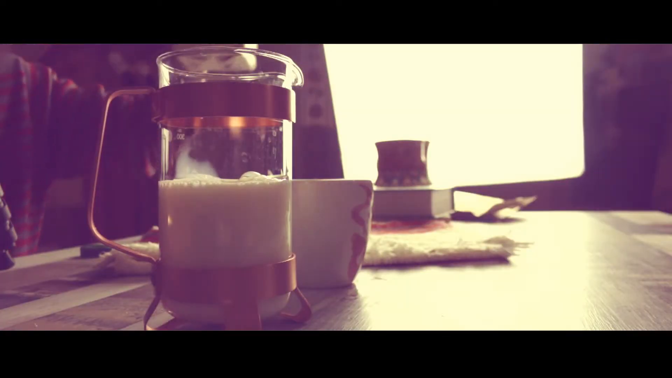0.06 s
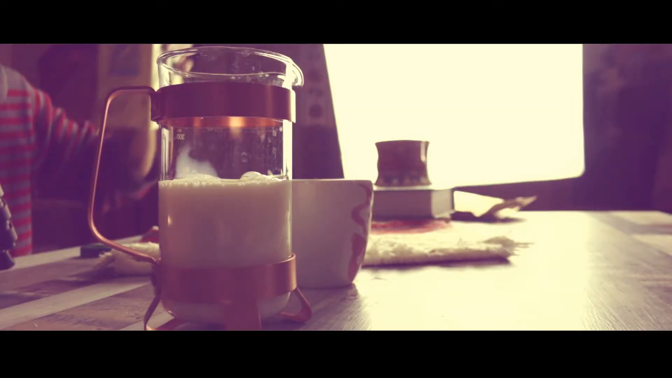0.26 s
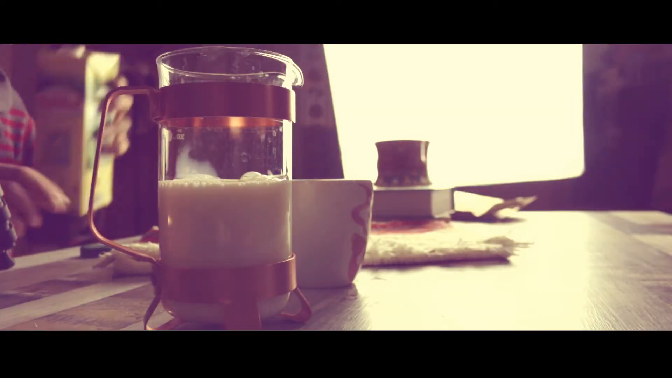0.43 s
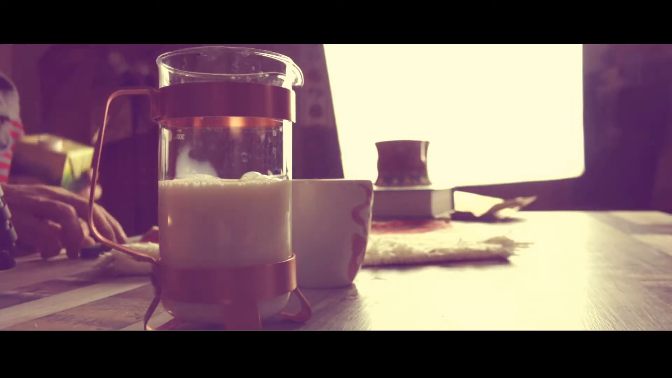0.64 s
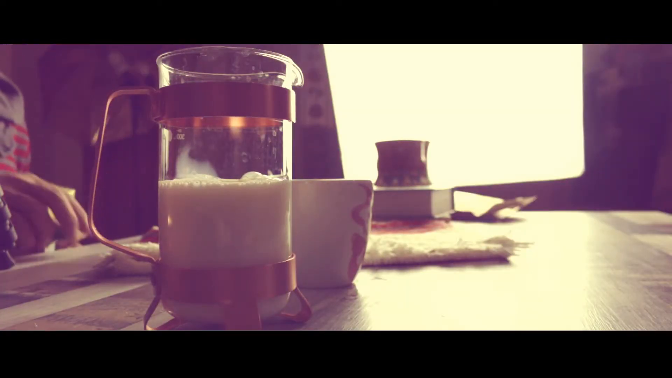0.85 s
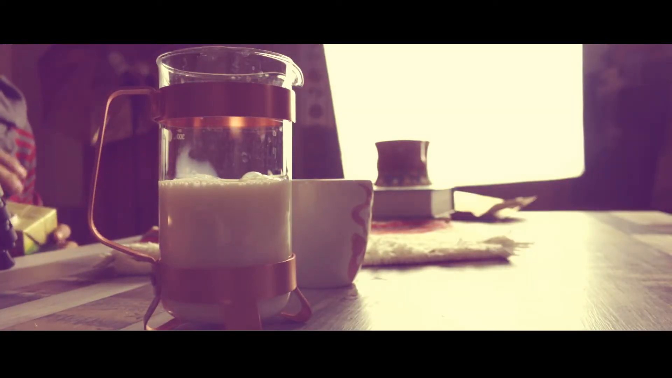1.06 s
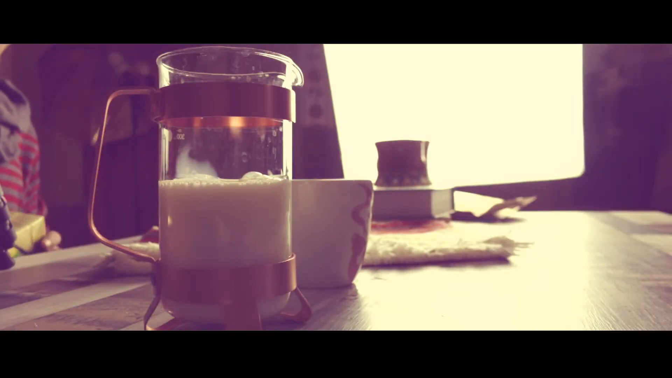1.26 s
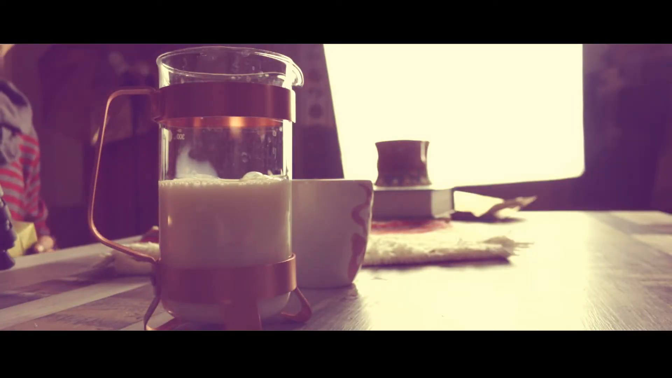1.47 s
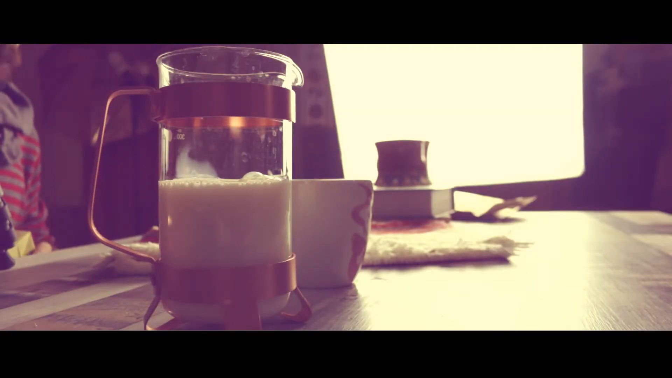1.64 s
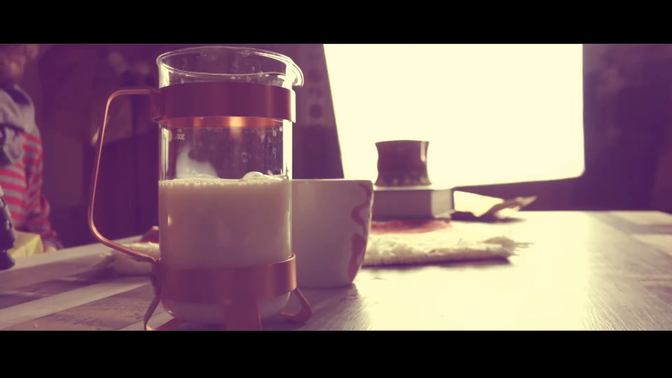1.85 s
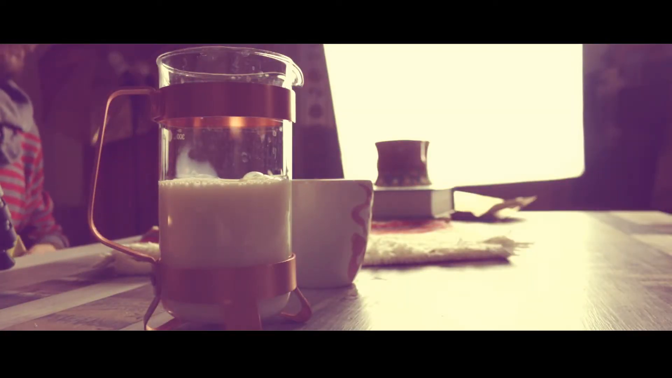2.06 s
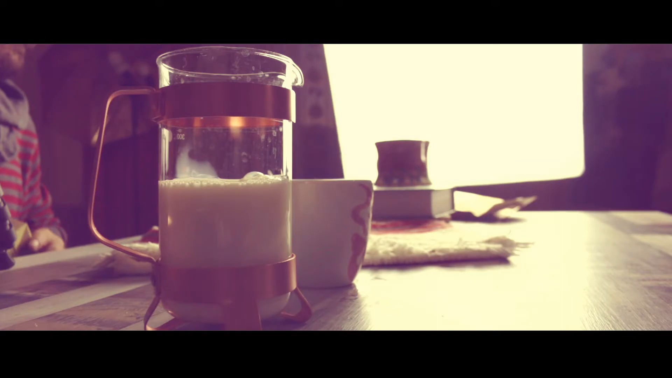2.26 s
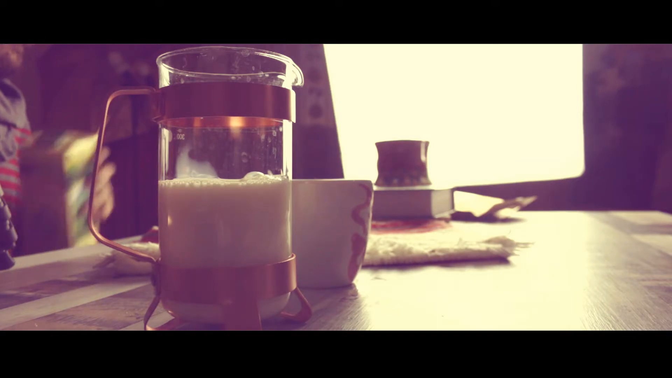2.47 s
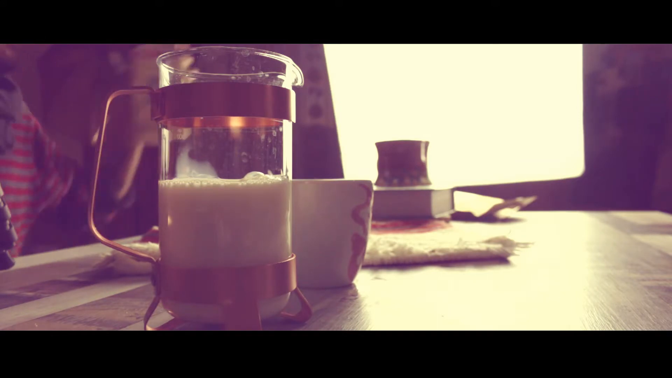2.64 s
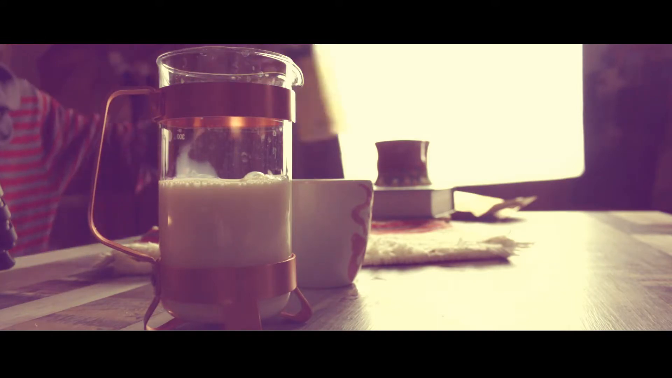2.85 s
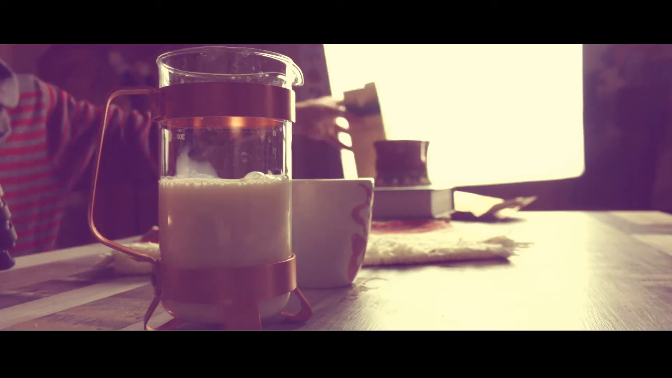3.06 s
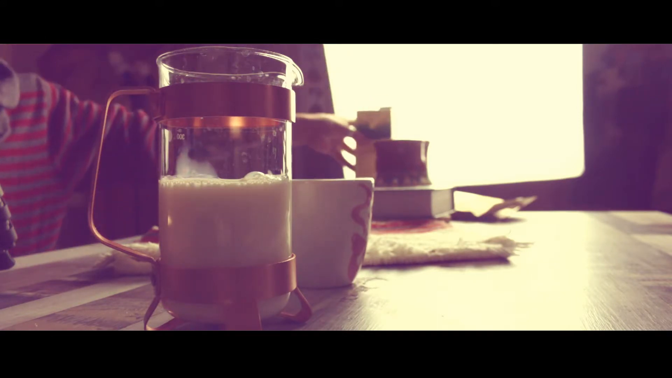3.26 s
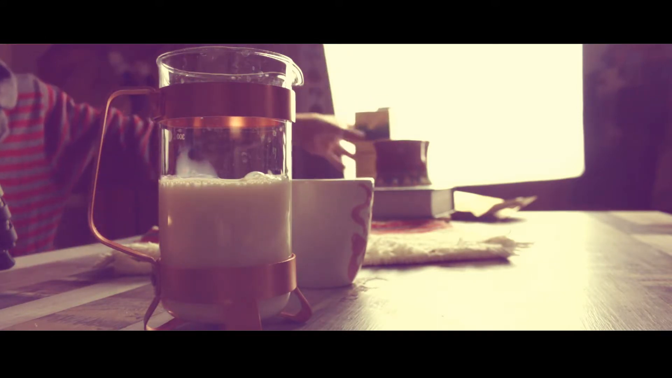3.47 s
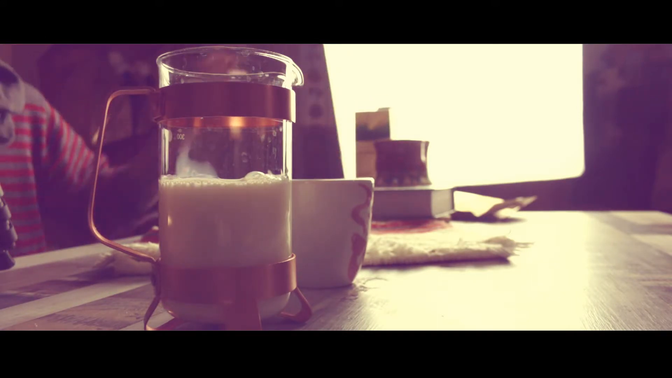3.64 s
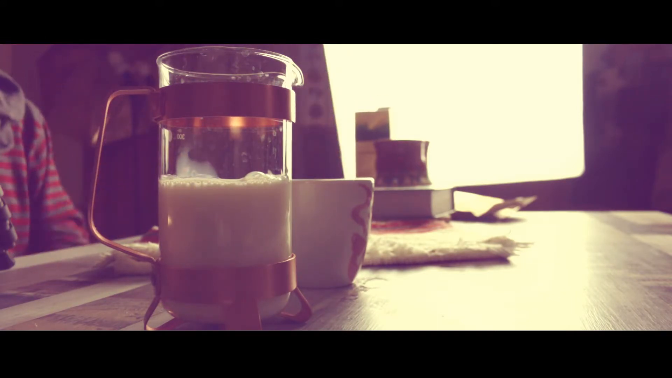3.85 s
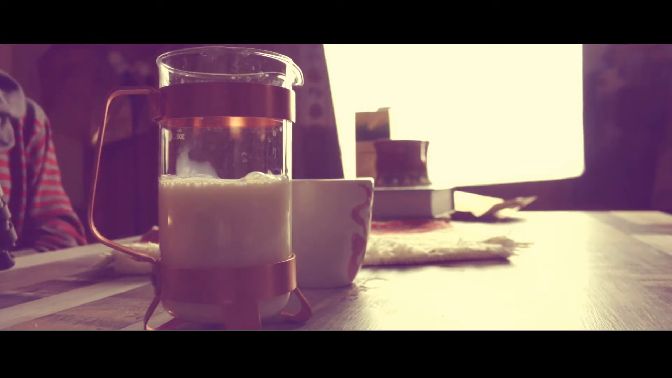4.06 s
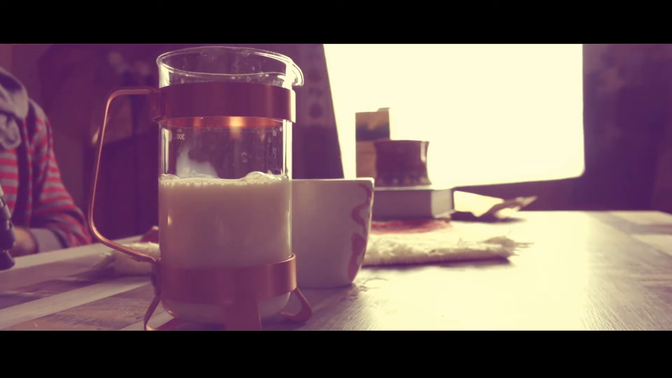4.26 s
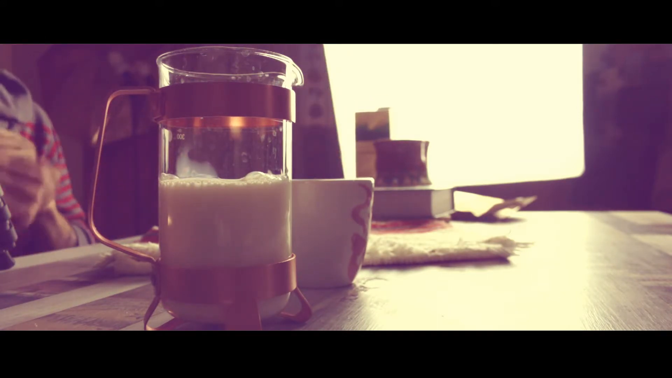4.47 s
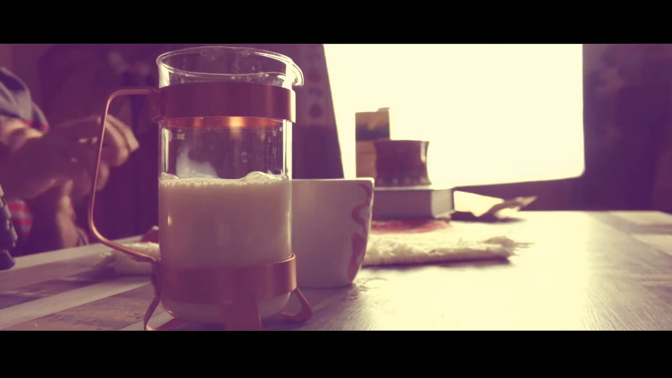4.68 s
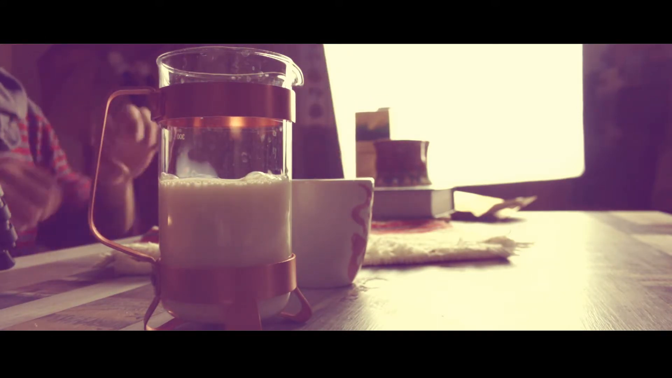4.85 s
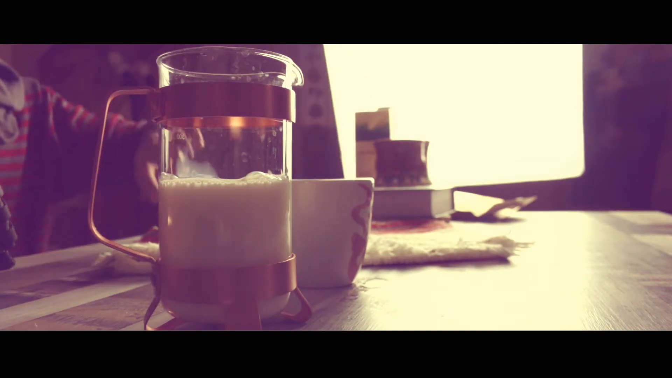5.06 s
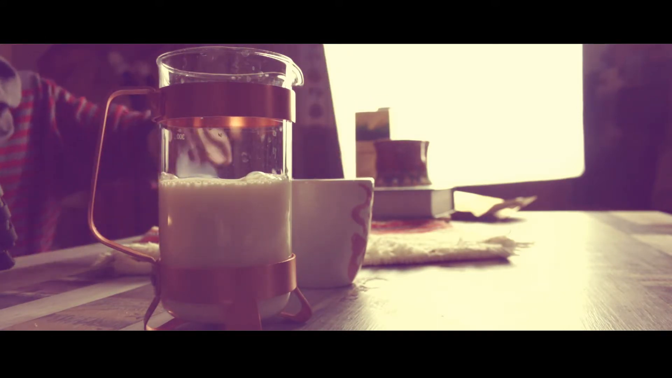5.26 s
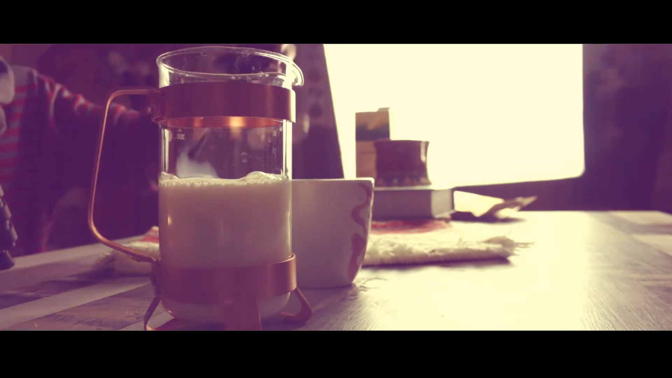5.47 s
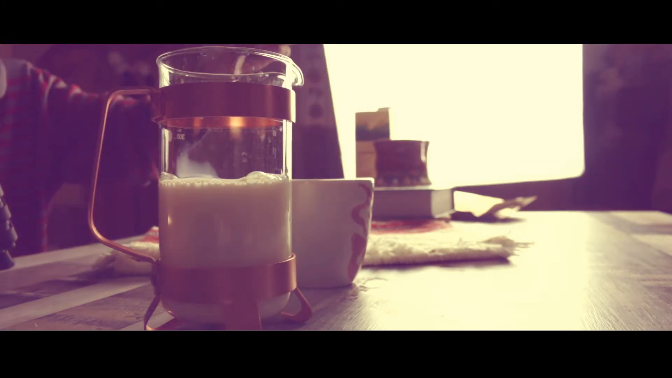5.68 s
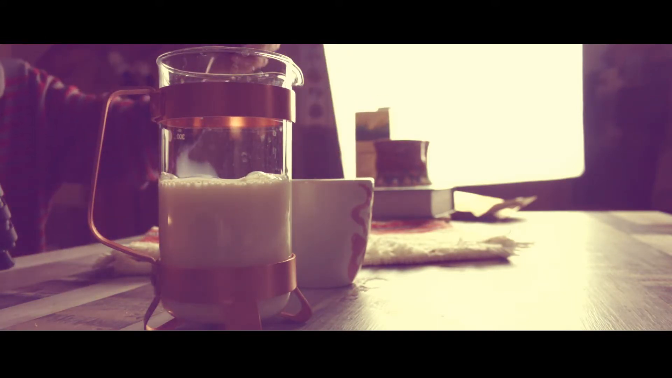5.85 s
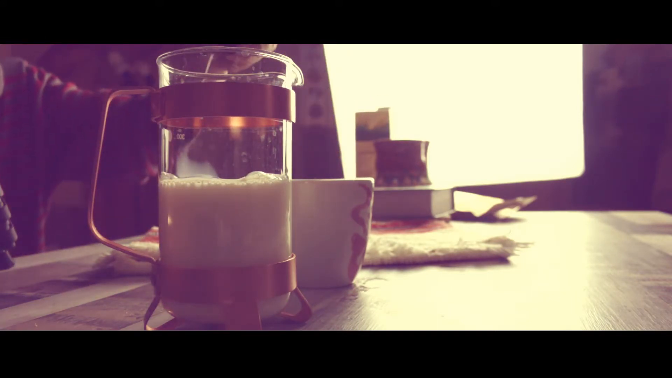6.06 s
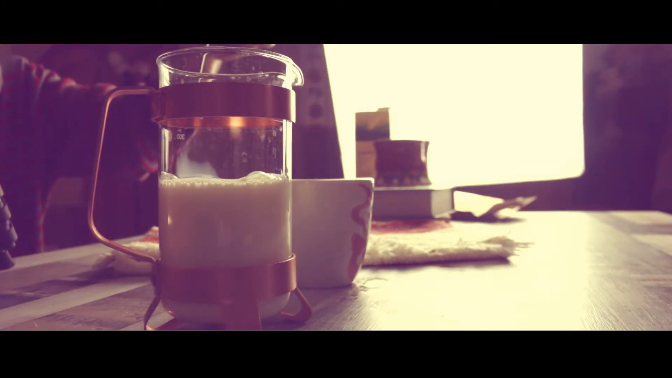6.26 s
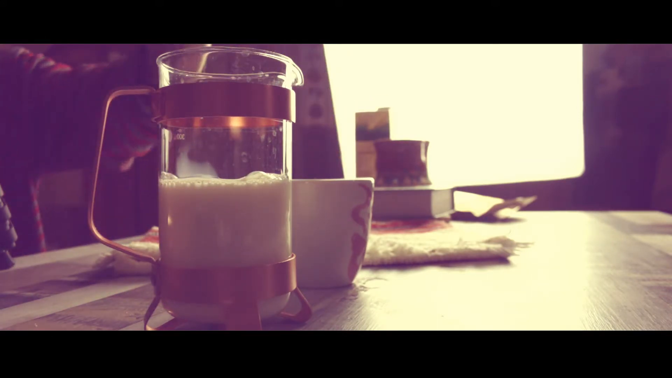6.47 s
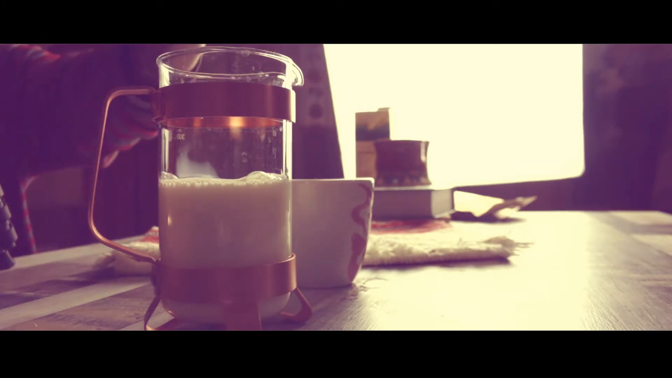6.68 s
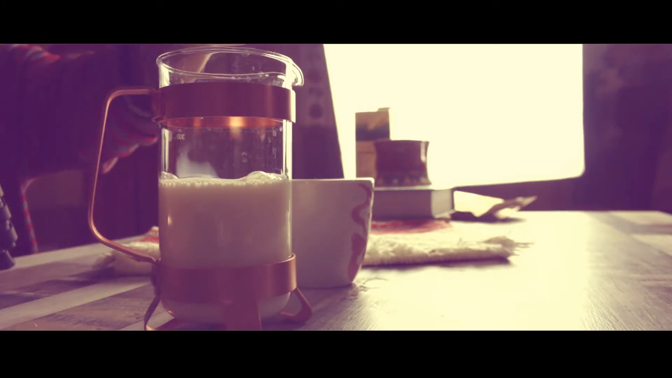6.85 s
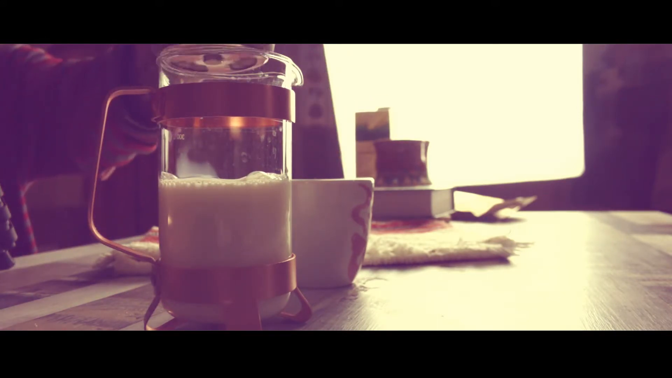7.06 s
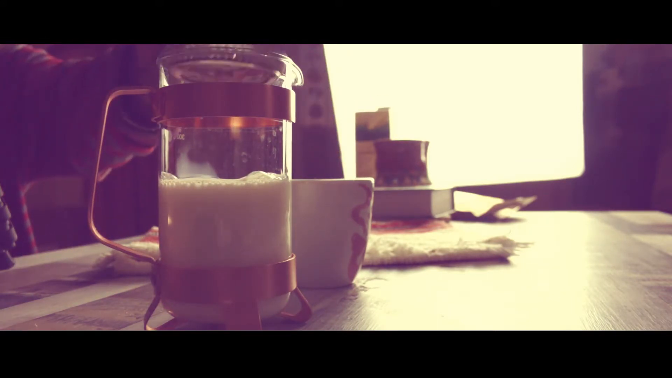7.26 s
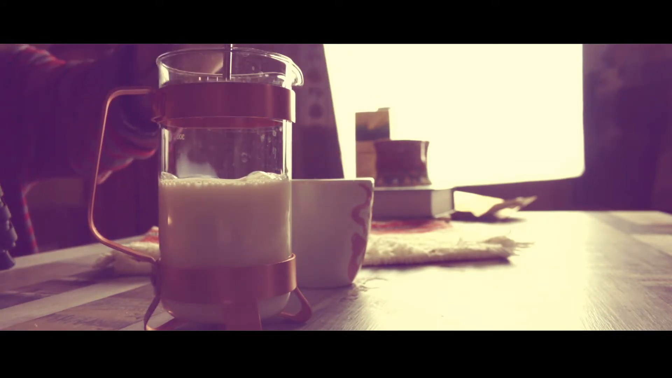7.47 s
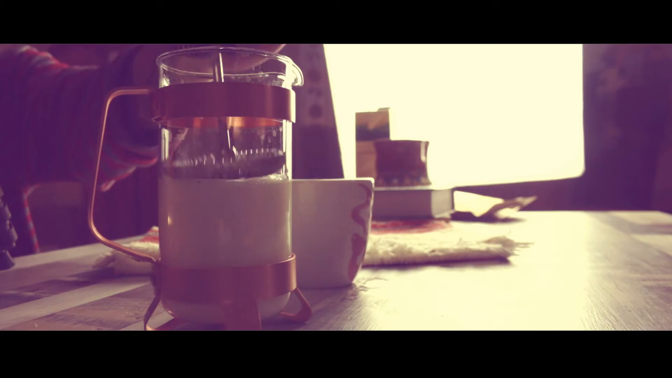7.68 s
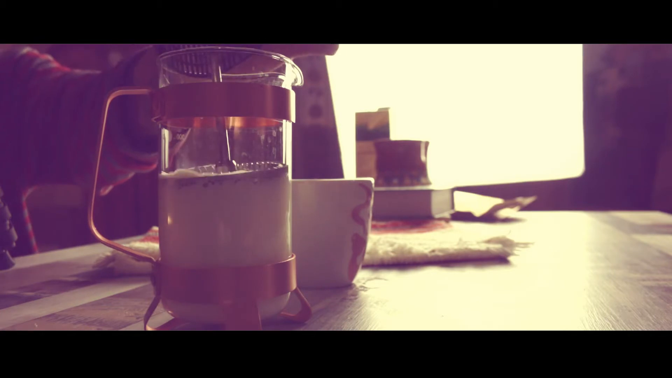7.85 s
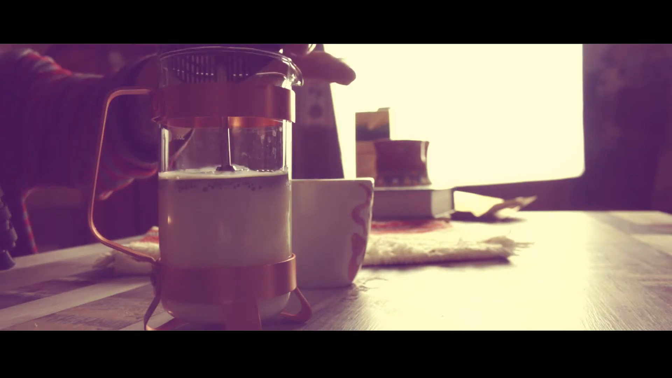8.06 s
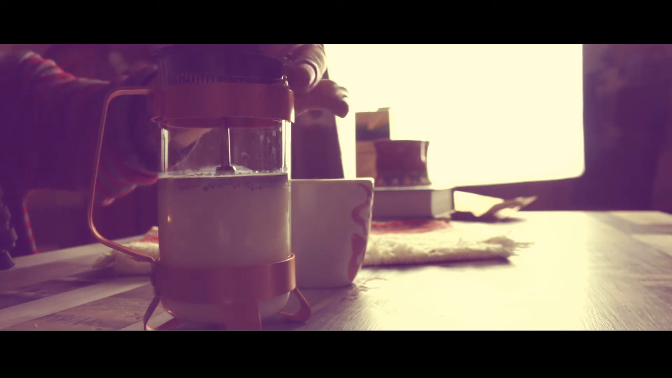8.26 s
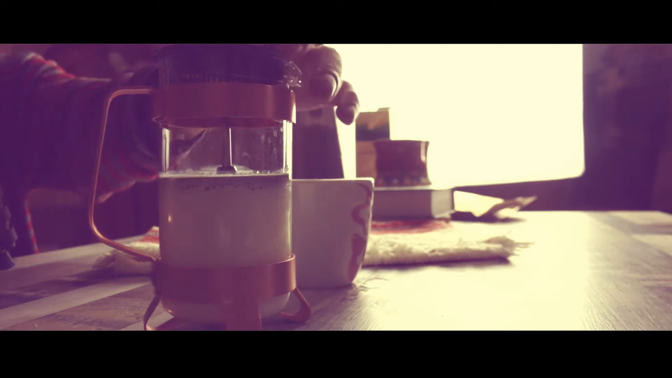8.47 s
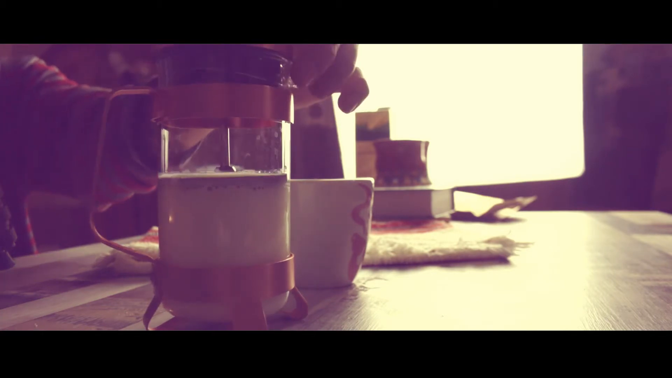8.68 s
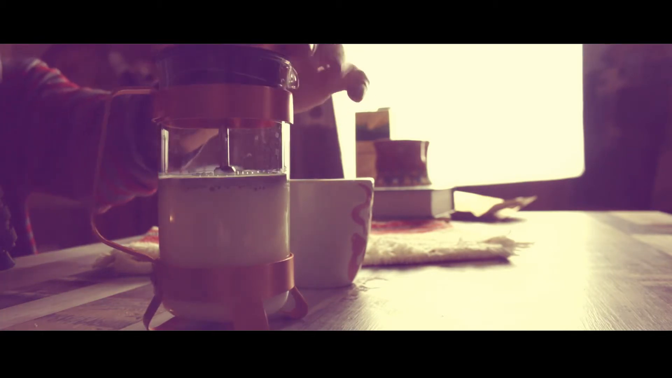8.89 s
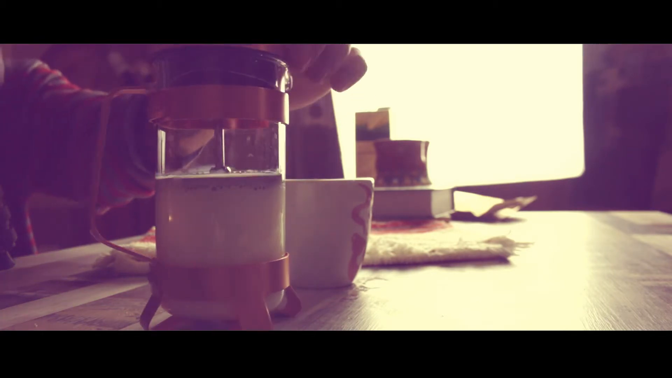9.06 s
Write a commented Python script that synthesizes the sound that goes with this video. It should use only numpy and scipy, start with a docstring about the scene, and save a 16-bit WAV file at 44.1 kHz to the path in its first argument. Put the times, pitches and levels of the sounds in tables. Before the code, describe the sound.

Sparse kitchen handling heard close, mostly left of centre, over quiet low hum and hiss. A carton is tapped, slid, capped with a sharp snap and put down with a thud. After a soft cloth rustle come bright irregular metal clicks, light ticks and scraping on glass, then a sudden loud metallic lid clack far above everything else. Faint rattles and a soft table thump end it in short room reverberation.

```python
"""Soft hollow taps on a milk carton come first, over a faint hum and hiss in a small, live room.
The carton is slid, capped and put aside; a metal plunger clicks in the hand, scrapes into a glass carafe,
and its lid lands with a loud clack. Heavier knocks thump through the wooden table.
Blows are short noise bursts plus dying sine tones, scrapes are swelling noise, and the room adds a noise tail."""
import sys
import numpy as np
from scipy import signal
from scipy.fft import rfft, irfft
from scipy.io import wavfile
from scipy.ndimage import uniform_filter1d

SR = 44100
rng = np.random.default_rng(int(sys.argv[2]) if len(sys.argv) > 2 else 0)


def dump(signal):
    """Clip the signal to [-1, 1] and save it as 16-bit WAV at the path in sys.argv[1]."""
    limited = np.clip(np.atleast_2d(signal).T, -1, 1)
    pcm = np.round(limited * 32767).astype(np.int16)
    wavfile.write(sys.argv[1], SR, pcm)


N = 402191
T = np.arange(SR) / SR  # time within a one-second sound [s]

# In all tables, level_db is that of the loudest 4 ms before panning, facing and room.
# tilt_db is treble tilt per octave; energy_db is a tone's energy against its contact unless noted.
# the filter disc touches the glass: start_s [s], level_db [dB], tilt_db [dB per octave]
RIM_TOUCHES = [(7.15, -26, 2), (7.224, -38.5, -0.5), (7.310, -36.5, -3.5), (7.379, -39, 0),
               (7.943, -31, 4.5), (8.005, -41, -0.5), (8.081, -33, 0.5)]
# the lid meets the carafe: start_s [s], level_db [dB], tilt_db [dB per octave]
LID_KNOCKS = [(8.169, -40.5, -1.5), (8.206, -29.5, 2), (8.2355, -5.5, 0.5), (8.258, -36, -4),
              (8.268, -18.5, 0), (8.677, -35.5, -8), (8.7405, -40, -4), (8.755, -25, -5)]
# the carton is set down, rocks and settles: start_s [s], level_db [dB], tilt_db [dB per octave]
SET_DOWN = [(3.3599, -26.5, 3), (3.365, -25, -0.5), (3.404, -41, -2), (3.457, -44.5, -1)]
# the disc sinks into the carafe: time_s [s], depth [0 at the rim to 1]
DEPTH = [(7.4, 0), (7.94, 0.17), (8.08, 0.83)]
# the air above the milk rings lower as the lid closes the mouth: time_s [s], pitch_hz [Hz]
AIR = [(7.15, 912), (7.94, 857), (8.17, 789), (8.232, 687), (8.244, 491), (8.68, 433)]
SEATED_S = 8.23  # when the lid is seated


def carafe():
    """The filter scrapes down the glass and the lid lands and rattles; each blow also rings the air above the milk."""
    # the filter mesh scrapes the glass: start_s [s], length_s [s], level_db [dB]
    mesh_rubs = [(7.355, 0.1, -44.5), (7.58, 0.54, -51), (8.175, 0.048, -36.5), (8.215, 0.031, -27),
                 (8.60, 0.13, -55), (8.765, 0.065, -43.5), (9.05, 0.4, -52.5)]
    # sound colours of the scraping mesh, the rim and the lid: frequency_hz [Hz], level_db [dB]
    mesh_colour = [(200, 5.5), (900, 4.5), (1400, 0.5), (5000, -3.5), (7800, 2.5), (10000, -8),
                   (15000, -31)]
    rim_colour = [(150, 7.5), (400, 5), (1800, -1), (4000, -5), (5500, -3), (7200, -6.5), (9000, -7.5),
                  (15000, -16)]
    lid_colour = [(150, -18.5), (620, -1.5), (1000, -10), (2080, 2), (2800, -6), (3400, -10), (3800, -4),
                  (4400, -11), (5700, -10.5), (6600, -5.5), (8600, -8.5), (9300, -17.5), (15000, -38)]
    # ringing of the scraped carafe, the filter disc and the lid: pitch_hz [Hz], energy_db [dB], t60_s [s]
    scrape_modes = [(910, -20, .1), (2340, -16.5, 0.073), (4300, -15, 0.089)]
    disc_modes = [(6640, -20, 0.027), (7090, -12, 0.013)]
    lid_modes = [(527, -27, 0.32), (1920, -21, 0.23), (2060, -20, 0.56), (2300, -26, 0.61),
                 (2480, -21, 0.56), (2660, -30, 0.3), (3770, -21, 0.44), (3820, -21, 0.35),
                 (8240, -16, 0.12)]

    scrape = rubs(mesh_rubs, mesh_colour, attack_s=0.043, drag_db=0, grain_db=3.5, likeness=0.67, pan_db=4.5)
    out = scrape + set_ringing(scrape, ring(scrape_modes)) + squeezed_air()

    for start_s, level_db, tilt_db in RIM_TOUCHES:
        # the deeper the disc, the stronger the glass wall's ping
        ping = (4080, -27 + 27 * at(DEPTH, start_s), 0.13)
        modes = excited(disc_modes, tilt_db) + [ping]
        touch = strike(rim_colour, modes, tilt_db, chatter_t60=0.03, snap_db=-11.5, waver=0.0036)
        add(out, start_s, touch + air(start_s, -13, t60=0.13), level_db, pan_db=5.0)

    for start_s, level_db, tilt_db in LID_KNOCKS:
        modes = excited(lid_modes, tilt_db)
        knock = strike(lid_colour, modes, tilt_db, chatter(0.017, tilt_db), snap_db=-8.0,
                       waver=0.0135, sag=0.0119)
        disc = amp(5) * ring(excited(disc_modes[:1], tilt_db))
        add(out, start_s, knock + disc + air(start_s, -6, t60=0.06), level_db, pan_db=4.5)
    return out


def air(start_s, energy_db, t60):
    """The air above the milk rings after a blow, its pitch gliding as the mouth closes."""
    phase = 2 * np.pi * np.cumsum(at(AIR, start_s + T)) / SR
    return amp(energy_db) * unit(np.sin(phase) * fade(t60))


def squeezed_air():
    """Air squeezed past the closing lid: narrow noise follows the falling air pitch, the scraped rim rises."""
    # loudness of this hollow scrape: time_s [s], level_db [dB of the air part, on average]
    squeeze = [(8.03, -58), (8.16, -66), (8.175, -47), (8.232, -35.5), (8.25, -63)]
    t = np.arange(N) / SR
    level = amp(at(squeeze, t)) * (t > squeeze[0][0]) * (t < squeeze[-1][0])
    low_pass = signal.butter(2, 35, fs=SR, output="sos")  # Hz either side of the moving pitch
    rim_hz = 1010 + 2000 * (t - SEATED_S)
    out = 0
    for pitch_hz, level_db in [(at(AIR, t), 0), (rim_hz, -6)]:
        flutter = signal.sosfilt(low_pass, pair(N, 0.68) + 1j * pair(N, 0.7))
        carrier = np.exp(2j * np.pi * np.cumsum(pitch_hz) / SR)  # moves the slow noise up to the pitch
        out = out + amp(level_db) * np.sqrt(N) * unit(np.real(flutter * carrier))
    return out * level


def plunger():
    """Rod, lid and filter plates click together as the plunger is picked up; small parts ring more briefly."""
    # loose metal parts click: start_s [s], level_db [dB], tilt_db [dB per octave],
    # note_hz [Hz], note_db [dB energy], bounce_db [dB against the click]
    clicks = [(5.234, -34, -2, 4250, -9.5, -6), (5.260, -39.5, -5, 2940, 1, -3),
              (5.333, -29.5, 0.5, 7750, -6.5, -8.5), (5.446, -45, 0, 2540, -6, -6),
              (5.8177, -23, -3, 6960, -5, -13), (5.983, -43.5, -7, 2300, -16, -9),
              (6.1011, -24, -2.5, 4800, -10, 1), (6.2818, -36, -1.5, 7950, -21, -11.5)]
    # sound colour of a click: frequency_hz [Hz], level_db [dB]
    click_colour = [(200, -39), (850, -21.5), (1450, -6.5), (2200, -2.5), (3200, -9), (4700, 0), (5800, -6),
                    (6900, 2.5), (8300, -0.5), (9300, -6.5), (15000, -28)]
    # ringing of the plunger, and of the lifted rod (relative energy): pitch_hz [Hz], energy_db [dB], t60_s [s]
    plunger_modes = [(2340, -22, 0.15), (4080, -24, 0.15), (4955, -28, 0.22)]
    rod_modes = [(975, -1, 0.3), (1906, 1.5, 0.27), (2900, 2, 0.58), (4447, 0, 0.13)]
    # the parts chatter less as the grip tightens: time_s [s], chatter_t60_s [s]
    grip = [(5.33, 0.1), (5.6, 0.028)]

    out = shifting_plates()
    add(out, 5.235, ring(rod_modes, waver=0.012), -40.5, pan_db=4.0)  # the rod is first lifted free
    for start_s, level_db, tilt_db, note_hz, note_db, bounce_db in clicks:
        note = (note_hz, note_db, 0.059 * np.sqrt(1000 / note_hz))
        chatter_t60 = at(grip, start_s)
        # a loosely held filter plate rings most
        plate = (2540, -14.5 + 20 * np.log10(chatter_t60 / at(grip, 0)), 0.38)
        modes = plunger_modes + [note, plate]
        # every click bounces once, with a brighter tilt
        click = (start_s, level_db, tilt_db)
        bounce = (start_s + 0.0042, level_db + bounce_db, tilt_db + 3.5)
        for hit_s, hit_db, hit_tilt_db in [click, bounce]:
            hit = strike(click_colour, modes, hit_tilt_db, chatter_t60, snap_db=-17)
            add(out, hit_s, hit, hit_db, pan_db=3.5)
    return out


def shifting_plates():
    """Tiny slips as the plates shift in the hand ring one for a moment before the fingers damp it."""
    # faint ticks: start_s [s], level_db [dB], pitch_hz [Hz]
    ticks = [(5.602, -50, 4360), (5.655, -48, 2350), (5.79, -51, 2390)]
    out = np.zeros((2, N))
    for start_s, level_db, pitch_hz in ticks:
        add(out, start_s, ring([(pitch_hz, 0, 0.014)], waver=0.05), level_db, pan_db=2)
    return out


def carton():
    """The carton is slid (rough noise), capped (snaps), tapped (hollow panel tones) and set down (knocks)."""
    # card slides, and last a hand brushes the table: start_s [s], length_s [s], level_db [dB]
    card_rubs = [(.749, 0.07, -35.5), (1.81, 0.12, -50), (2.32, 0.13, -50), (2.44, 0.13, -48.5),
                 (2.89, 0.32, -52), (3.095, 0.048, -46.5), (3.835, 0.22, -52)]
    # the plastic cap snaps shut: start_s [s], level_db [dB], tilt_db [dB per octave]
    cap_snaps = [(1.459, -43, -0.5), (1.481, -39, 0.5), (1.521, -33, 0.5), (1.617, -30.5, -2),
                 (1.6287, -20, 3), (2.12, -41, 4.5)]
    # fingers and table tap the hollow carton: start_s [s], level_db [dB], panel_hz [Hz], push_s [s]
    taps = [(.6405, -42, 335, 0.0012), (0.679, -45, 340, .002), (1.862, -42, 491, 0.0088),
            (2.345, -41, 900, 0.0027), (2.497, -40.5, 543, 0.01), (2.867, -47.5, 430, .003),
            (3.350, -35.5, 767, 0.0044), (3.5207, -38.5, 940, 0.0019)]
    # sound colours of sliding card, cap, tap and landing: frequency_hz [Hz], level_db [dB]
    card_colour = [(200, -10), (1000, -2.5), (1500, -5), (2850, -5), (3500, -10.5), (6000, -10),
                   (10000, -22.5), (15000, -51)]
    cap_colour = [(100, -43), (400, 2), (620, -1.5), (800, 0.5), (1230, -6.5), (1400, -11.5), (1530, -2),
                  (1750, -2), (2200, -16.5), (7000, -26.5), (15000, -47)]
    tap_colour = [(100, -33), (500, 7.5), (1500, -4.5), (4000, -10), (8000, -15), (15000, -43)]
    landing_colour = [(100, -10), (480, 5), (680, -8), (850, -7.5), (1200, -14.5), (1830, -7), (2150, -23),
                      (2450, -8), (3000, -19), (15000, -42)]
    # ringing of the slid walls, the cap, the landing carton, and the box and crockery that it jolts:
    # pitch_hz [Hz], energy_db [dB], t60_s [s]
    card_modes = [(1550, -16.5, 0.03), (2920, -17, 0.14)]
    cap_modes = [(625, -7.5, 0.08), (745, -12, 0.092), (1080, -12.5, 0.062), (1538, -11, 0.12),
                 (1669, -13, 0.2)]
    landing_modes = [(456, -7, 0.06), (527, -6, 0.076), (1860, -17, 0.24)]
    jolted_modes = [(358, -18, 0.058), (2296, -17, 0.28), (2450, -17, .2)]

    slide = rubs(card_rubs, card_colour, attack_s=0.032, drag_db=-2.5, grain_db=3.0, likeness=0.68, pan_db=5.5)
    out = slide + set_ringing(slide, ring(card_modes, waver=0.0045))

    for start_s, level_db, tilt_db in cap_snaps:
        snap = strike(cap_colour, cap_modes, tilt_db, chatter(0.047, tilt_db), snap_db=-9.0, waver=0.017)
        add(out, start_s, snap, level_db, pan_db=7.0)

    for start_s, level_db, panel_hz, push_s in taps:
        tick = unit(colour(pair(SR, 0.67) * fade(0.035), tap_colour, tilt_db=4.0))
        tones = ring([(panel_hz, 0, 0.034), (0.634 * panel_hz, -6, 0.03)], waver=0.044)
        panel = unit(tones * np.minimum(T / push_s, 1) ** 2)
        # a slow push ticks less; at 0.00042 s tick and panel have equal energy
        add(out, start_s, panel + np.sqrt(0.00042 / push_s) * tick, level_db, pan_db=5.5)

    for start_s, level_db, tilt_db in SET_DOWN:
        modes = excited(landing_modes, tilt_db) + jolted_modes
        knock = strike(landing_colour, modes, tilt_db, chatter(0.056, tilt_db), snap_db=-10.5, waver=0.003)
        add(out, start_s, knock, level_db, pan_db=3.5)
    return out


def sleeve():
    """A sleeve brushes along: soft noise that swells slowly and dies away."""
    # the brush: start_s [s], length_s [s], level_db [dB]
    strokes = [(3.93, 0.42, -50.5)]
    # sound colour of cloth: frequency_hz [Hz], level_db [dB]
    cloth_colour = [(200, -9), (800, 6), (1900, 2), (7000, -3.5), (15000, -24)]
    return rubs(strokes, cloth_colour, attack_s=0.21, drag_db=1.5, grain_db=0.0, likeness=0.14, pan_db=6.5)


def table():
    """The table top booms and shakes the microphone on it: one pitch for the carton, a lower one for all else."""
    # other tones of the table top: pitch_hz [Hz], energy_db [dB against the boom], t60_s [s]
    table_modes = [(68.2, -4.5, 0.62), (123.6, -6, 0.23)]
    out = np.zeros((2, N))
    for start_s, level_db, boom_hz in loads():
        boom = ring(table_modes + [(boom_hz, 0, 0.44)], spread=4, detune=0.03)
        add(out, start_s, boom * (1 - fade(0.034)), level_db, pan_db=2.0)  # soft onset
    return out


def loads():
    """List what weighs on the table (start_s, level_db, boom_hz): carton, leaning hands, disc and seated lid."""
    # a hand leans on the table: start_s [s], level_db [dB]
    leans = [(0.685, -45), (9.004, -41.5)]
    carton_boom_hz, other_boom_hz = 95.7, 81.7
    landing_s, landing_db, _ = SET_DOWN[1]
    out = [(landing_s, landing_db - 2, carton_boom_hz)]
    for start_s, level_db in leans:
        out.append((start_s, level_db, other_boom_hz))
    for start_s, level_db, _ in RIM_TOUCHES:
        # the deeper disc loads the table less
        out.append((start_s, level_db - 4.5 - 51 * at(DEPTH, start_s), other_boom_hz))
    for start_s, level_db, _ in LID_KNOCKS:
        if start_s > SEATED_S:
            # the seated lid passes its knocks on, a little later and more evenly
            out.append((start_s + 0.0327, -33.5 + 0.25 * level_db, other_boom_hz))
    return out


def facing(x):
    """Direct sound leans left most in the middle range, as the left microphone faces the work."""
    # difference between the sides: frequency_hz [Hz], left_minus_right_db [dB]
    facing_curve = [(100, -1), (500, -0.5), (1200, 4), (2400, 2), (5000, -4.5), (8000, -6), (15000, -3)]
    lean = gains(facing_curve, N) ** np.array([[0.5], [-0.5]])
    return irfft(rfft(x) * lean, N)


def room(x, wet_db):
    """Diffuse reflections, unrelated left and right, build up quickly and die a little sooner in the treble."""
    # colour of what the room gives back: frequency_hz [Hz], level_db [dB, before wet_db]
    room_colour = [(60, -13), (250, -2.5), (600, -7.5), (2000, -6), (5000, -7), (8000, -10), (14000, -15)]
    noise = rng.standard_normal((2, SR))
    low = signal.sosfilt(signal.butter(2, 3500, fs=SR, output="sos"), noise)
    high = noise - low
    build_up = 1 - np.exp(-(T / 0.0094) ** 2)
    tail = unit((low * fade(0.62) + high * fade(0.59)) * build_up)
    wet = set_ringing(x.mean(axis=0, keepdims=True), colour(tail, room_colour))
    return wet * amp(wet_db) * sides(2.2)


def background():
    """A wavering low hum and rumble, much alike on both sides, under an even hiss: all filtered noise."""
    # steady noise: frequency_hz [Hz], level_db [dB per Hz, relative]
    noise_colour = [(15, -54), (25, -6.5), (101, -6.5), (240, -8.5), (826, -15), (2920, -21.5),
                    (15500, -26.5)]
    f = np.fft.rfftfreq(N, 1 / SR)
    alike = 1 / (1 + (f / 170) ** 2)  # the bass is shared between the sides
    noise = np.sqrt(alike) * rfft(pair(N, 0.57)) + np.sqrt(1 - alike) * rfft(pair(N, 0))
    hiss = unit(irfft(noise * gains(noise_colour, N), N))
    hum_band = 1 / (1 + ((f - 96) / 9) ** 2)  # centre and half-width in Hz
    hum = unit(irfft(rfft(pair(N, 0.64)) * hum_band, N))
    mix = amp(-54.5) * hiss + amp(-64) * hum
    lean = sides(3.5 / (1 + f / 2500))  # the bass leans left
    return np.sqrt(N) * irfft(rfft(mix) * lean, N)


def strike(spectrum, modes, tilt_db, chatter_t60, snap_db, waver=0.004, sag=0):
    """One blow: a first snap and a dying chatter of tiny contacts, shaped by the body, plus its ringing tones."""
    force = unit(pair(SR, 0.61) * fade(chatter_t60))
    force[:, 0] += amp(snap_db)
    power = uniform_filter1d(np.mean(np.abs(rfft(force)) ** 2, axis=0), size=160)
    even_force = causal(force, power ** -0.25)  # partly evens out the spectrum
    contact = unit(colour(even_force, spectrum, tilt_db))
    return contact + ring(modes, waver=waver, sag=sag)


def ring(modes, spread=0.75, detune=0.00448, waver=0, sag=0):
    """Dying sine tones, slightly detuned and wavering at random, some sagging in pitch; phase differs by side."""
    out = 0
    for pitch_hz, energy_db, t60 in modes:
        phase = spread * min(pitch_hz / 1000, 2) * rng.standard_normal((2, 1))
        drift = np.interp(T, np.linspace(0, 1, 90), rng.standard_normal(90))
        # detune, waver and sag are shares of the pitch
        pitch = pitch_hz * (1 + detune * rng.standard_normal() + waver * drift + sag * fade(t60))
        tone = np.sin(2 * np.pi * np.cumsum(pitch) / SR + phase)
        out = out + amp(energy_db) * unit(tone * fade(t60))
    return out


def rubs(strokes, spectrum, attack_s, drag_db, grain_db, likeness, pan_db):
    """Friction: dense slips of uneven size swell and die; drag_db tilts the treble per doubling of length."""
    out = np.zeros((2, N))
    for start_s, length_s, level_db in strokes:
        swell_s = min(attack_s, 0.64 * length_s)
        pressure = np.interp(T, [0, swell_s, length_s], [0, 1, 0])
        tilt_db = drag_db * np.log2(length_s / 0.064)
        grain = np.repeat(rng.standard_normal(SR), 32)[:SR]  # a new slip size every 32 samples
        slips = pair(SR, likeness) * amp(grain_db * grain) * pressure ** 1.03
        add(out, start_s, colour(slips, spectrum, tilt_db), level_db, pan_db)
    return out


def excited(modes, tilt_db):
    """A duller contact wakes the high tones less."""
    return [(hz, energy_db + tilt_db * np.log2(hz / 1000), t60) for hz, energy_db, t60 in modes]


def chatter(t60, tilt_db):
    """A softer contact is duller and lasts longer: 4.5 dB per octave less tilt doubles its chatter time."""
    return t60 * 2 ** (-tilt_db / 4.5)


def set_ringing(x, response):
    """Let a sound continuously excite a ringing body or room."""
    return signal.fftconvolve(x, response, axes=1)[:, :N]


def add(out, start_s, sound, level_db, pan_db):
    """Mix in a sound, levelled by its loudest 4 ms; pan_db is left minus right."""
    loudest = np.sqrt(uniform_filter1d(np.mean(sound ** 2, axis=0), size=176).max())
    start = int(start_s * SR)
    part = sound[:, :N - start] / loudest
    out[:, start:start + part.shape[1]] += part * amp(level_db) * sides(pan_db)


def sides(pan_db):
    """Left and right gains for a left-minus-right difference."""
    return amp(np.array([[0.5], [-0.5]]) * pan_db)


def at(curve, time_s):
    """Value of a (time, value) curve, with straight lines between its points."""
    return np.interp(time_s, *np.transpose(curve))


def amp(db):
    """Decibels to gain."""
    return 10 ** (np.asarray(db) / 20)


def unit(x):
    """Scale each channel to an energy of 1."""
    return x / np.sqrt(np.sum(x ** 2, axis=-1, keepdims=True))


def fade(t60):
    """Exponential decay by 60 dB in t60 seconds."""
    return np.exp(-np.log(1000) * T / max(t60, 1e-3))


def pair(size, likeness):
    """Left and right noise, alike by a share from 0 to 1."""
    common, own = rng.standard_normal(size), rng.standard_normal((2, size))
    return np.sqrt(likeness) * common + np.sqrt(1 - likeness) * own


def gains(spectrum, size, tilt_db=0):
    """Turn a (Hz, dB) spectrum into a gain per FFT bin, tilted about 1 kHz."""
    f = np.maximum(np.fft.rfftfreq(size, 1 / SR), 1)
    hz, db = np.transpose(spectrum)
    curve_db = np.interp(np.log(f), np.log(hz), db)
    octaves = np.log2(np.maximum(f, 300) / 1000)  # the tilt stops below 300 Hz
    return amp(curve_db + tilt_db * octaves)


def colour(x, spectrum, tilt_db=0):
    """Filter a sound by a (Hz, dB) spectrum."""
    return causal(x, gains(spectrum, x.shape[-1], tilt_db))


def causal(x, gain):
    """Minimum-phase filter with the given gain per FFT bin, so that attacks stay sharp."""
    size = x.shape[-1]
    cepstrum = irfft(np.log(gain), size)
    cepstrum[1:size // 2] *= 2
    cepstrum[size // 2 + 1:] = 0
    return irfft(rfft(x) * np.exp(rfft(cepstrum, size)), size)


def scene():
    """All sources in the room; the carton and sleeve get the most reverberation, the carafe the least."""
    glass, metal, box, cloth = carafe(), plunger(), carton(), sleeve()
    direct = facing(glass + metal + box + cloth)
    reflections = room(glass, wet_db=-0.5) + room(metal, wet_db=1.5) + room(box + cloth, wet_db=5.0)
    return direct + table() + reflections + background()


def record(dry):
    """Peaks beyond full scale are clipped; then the treble above 16.1 kHz is cut."""
    low_pass = signal.ellip(8, 0.2, 70, 16100, fs=SR, output="sos")
    return signal.sosfilt(low_pass, np.clip(dry, -1, 1))


dry = scene()
out = record(dry)
dump(out)
```